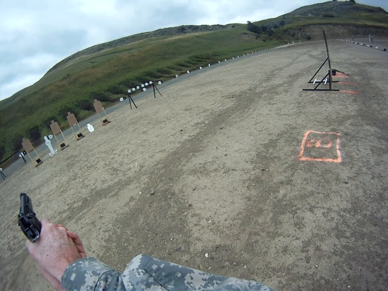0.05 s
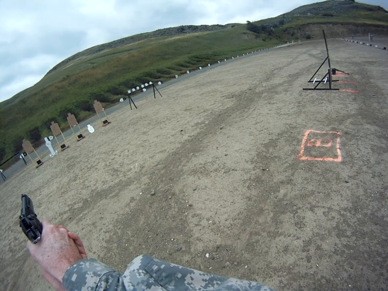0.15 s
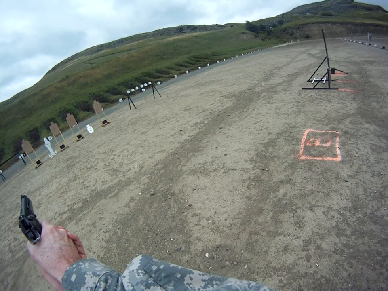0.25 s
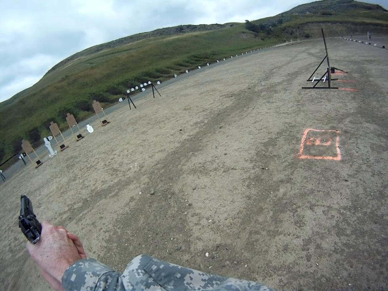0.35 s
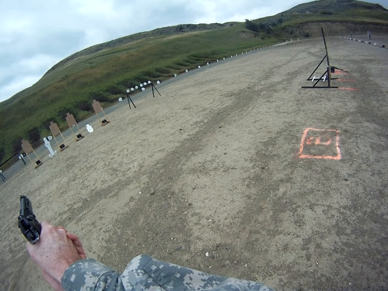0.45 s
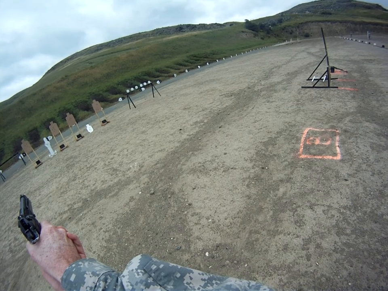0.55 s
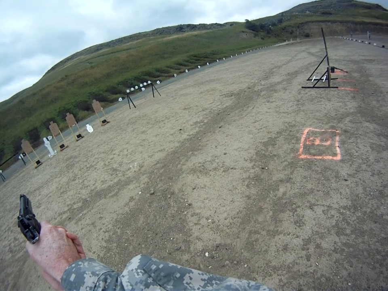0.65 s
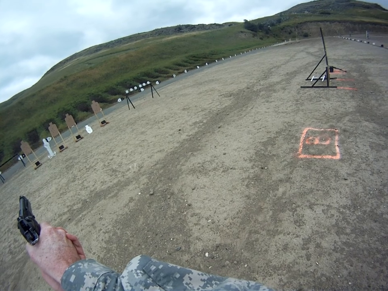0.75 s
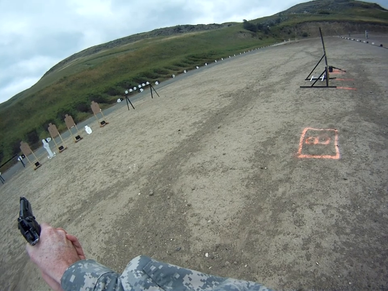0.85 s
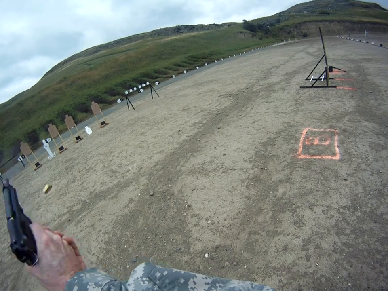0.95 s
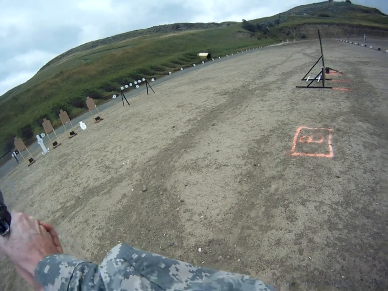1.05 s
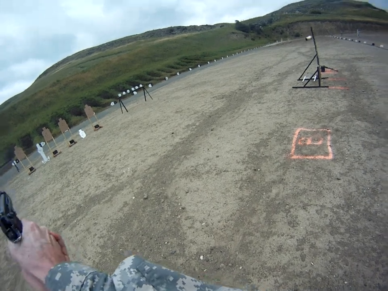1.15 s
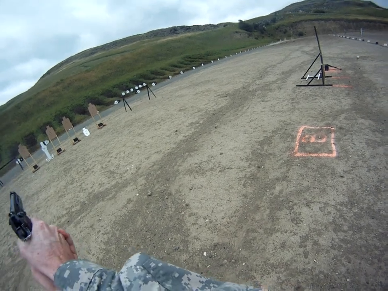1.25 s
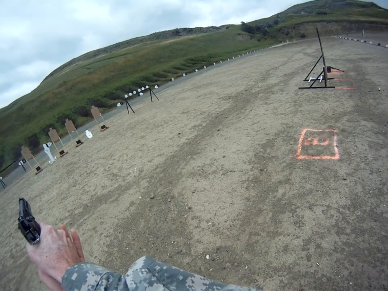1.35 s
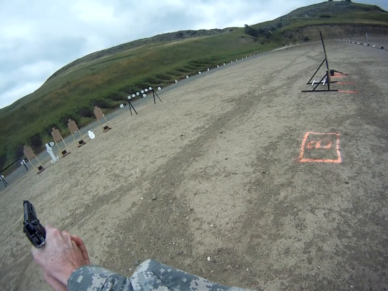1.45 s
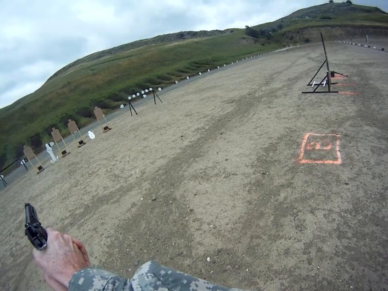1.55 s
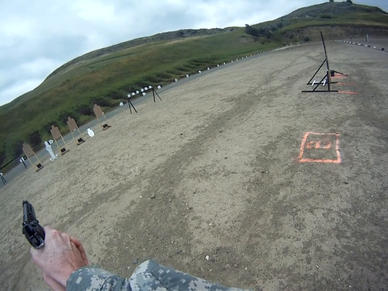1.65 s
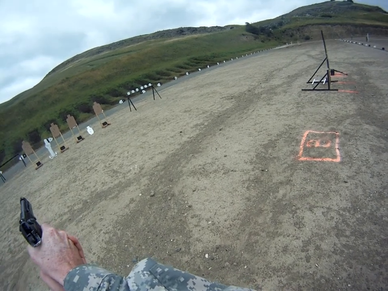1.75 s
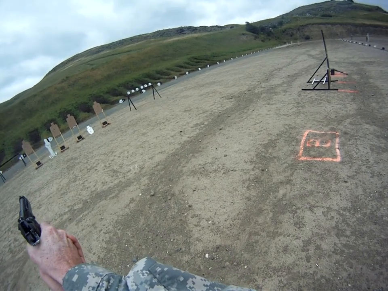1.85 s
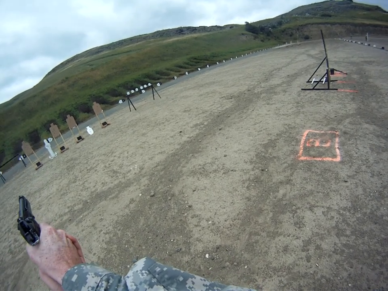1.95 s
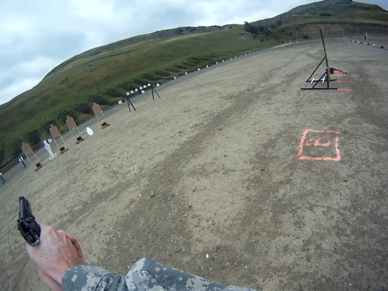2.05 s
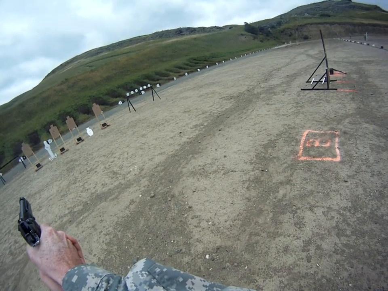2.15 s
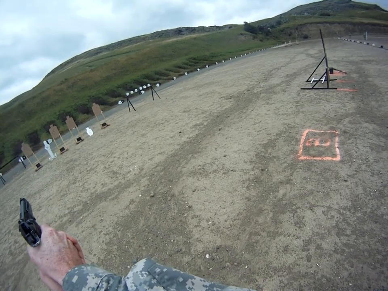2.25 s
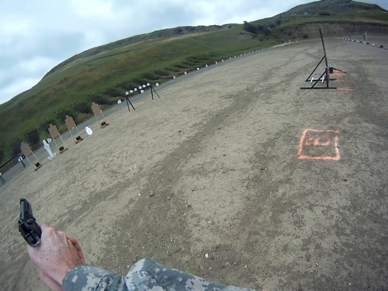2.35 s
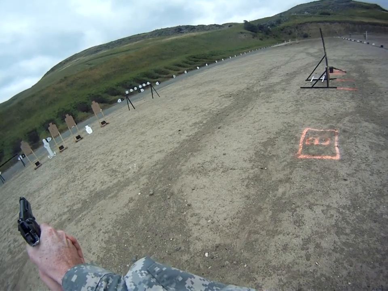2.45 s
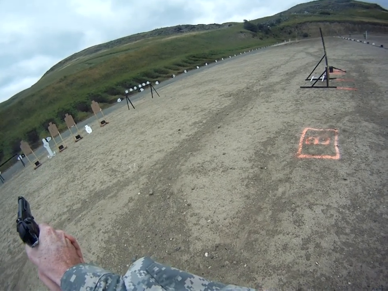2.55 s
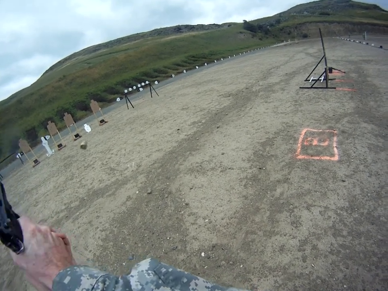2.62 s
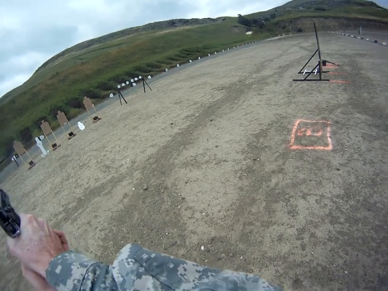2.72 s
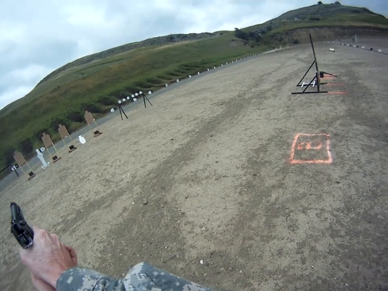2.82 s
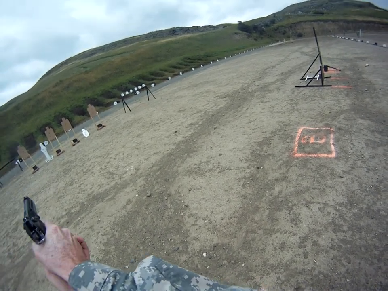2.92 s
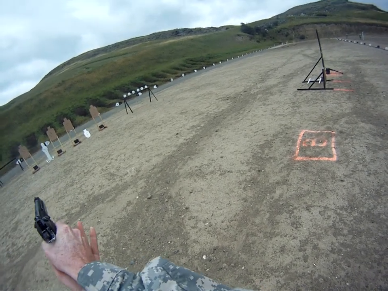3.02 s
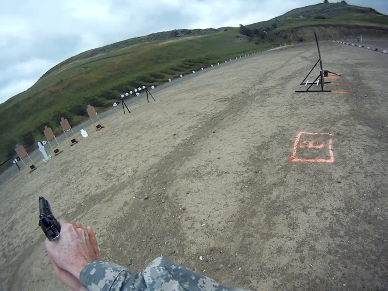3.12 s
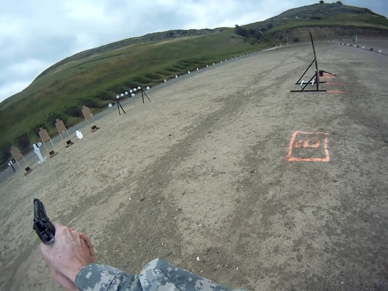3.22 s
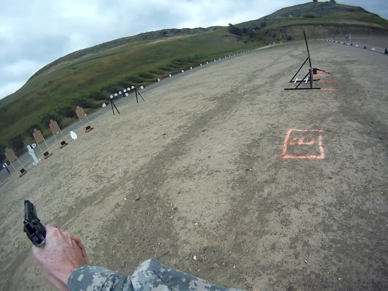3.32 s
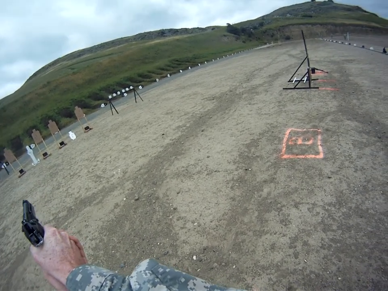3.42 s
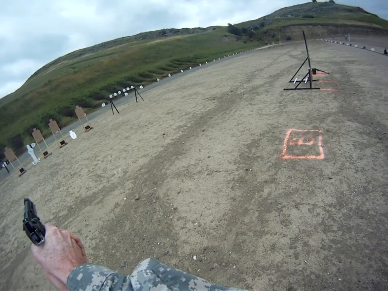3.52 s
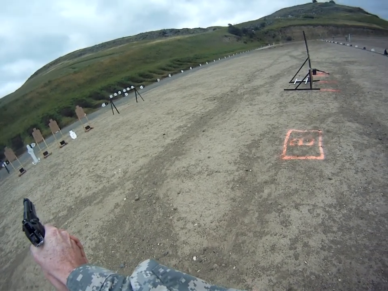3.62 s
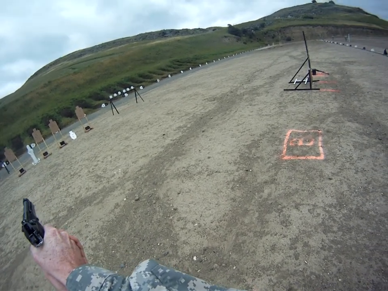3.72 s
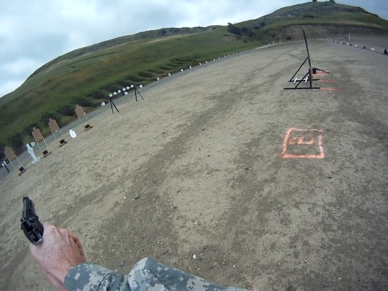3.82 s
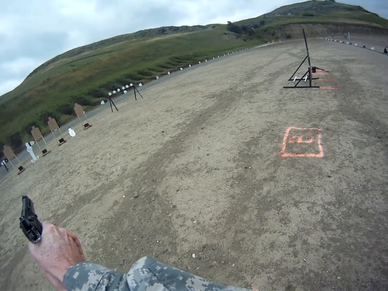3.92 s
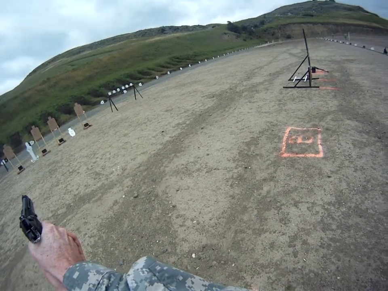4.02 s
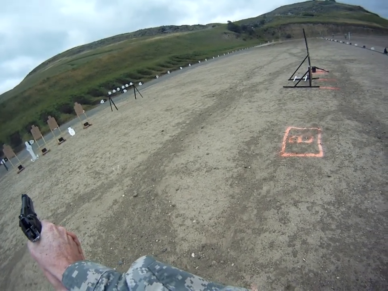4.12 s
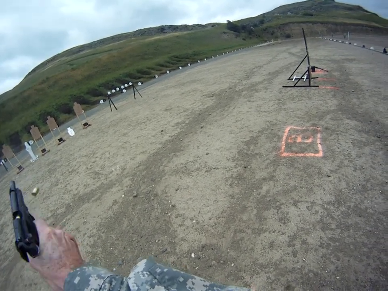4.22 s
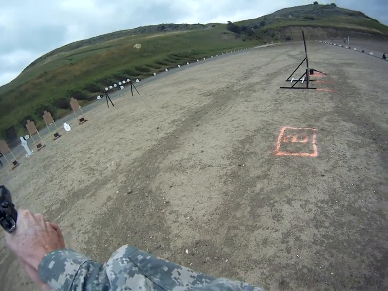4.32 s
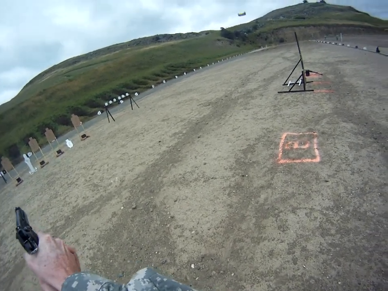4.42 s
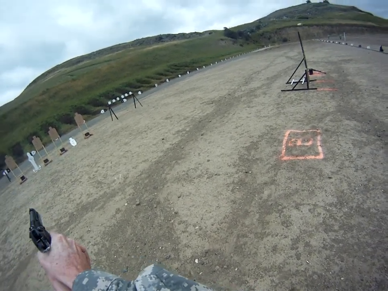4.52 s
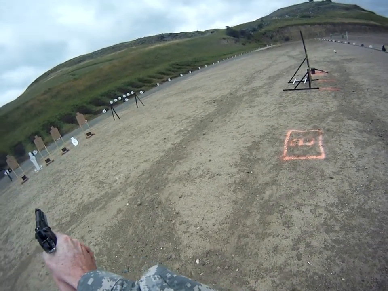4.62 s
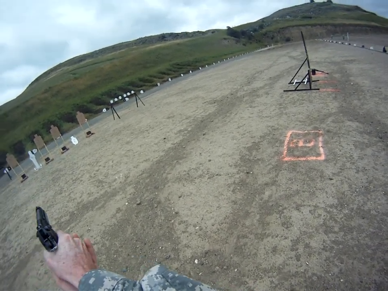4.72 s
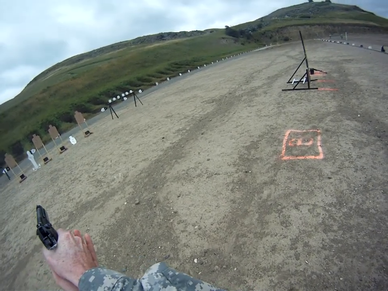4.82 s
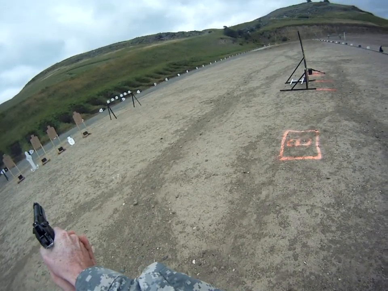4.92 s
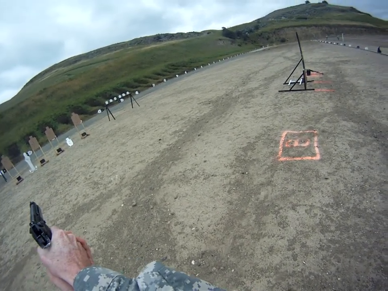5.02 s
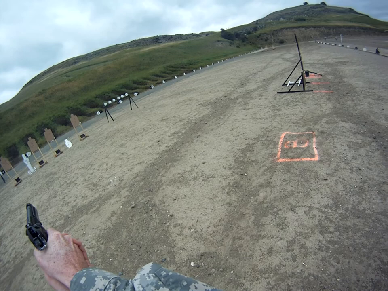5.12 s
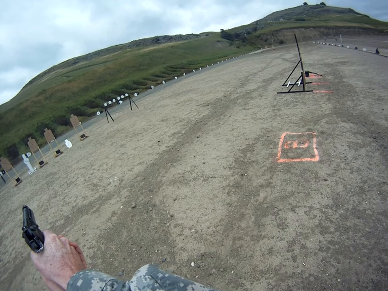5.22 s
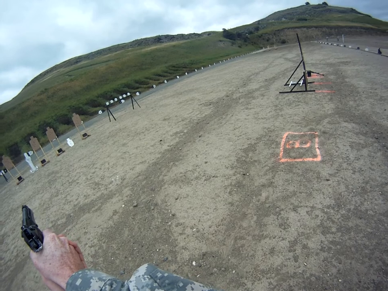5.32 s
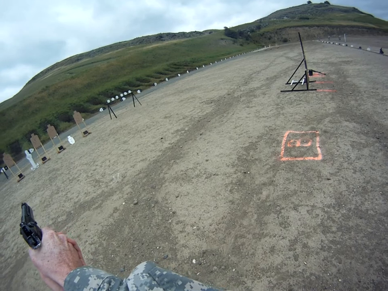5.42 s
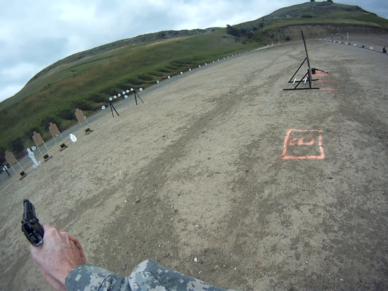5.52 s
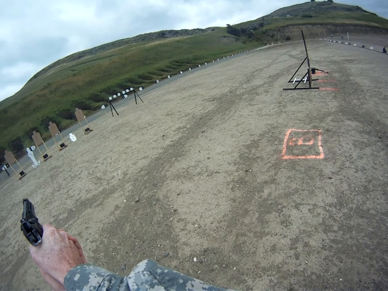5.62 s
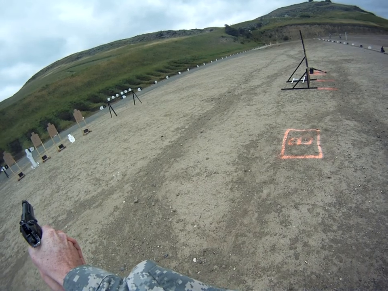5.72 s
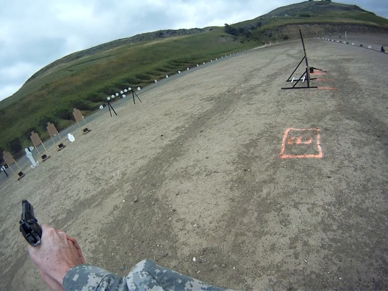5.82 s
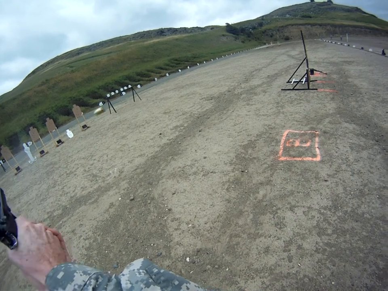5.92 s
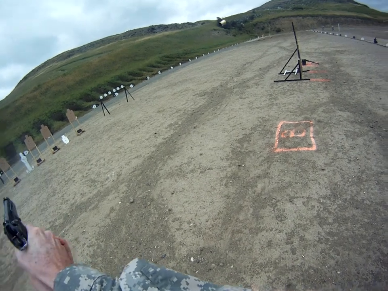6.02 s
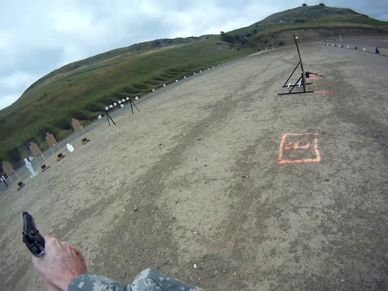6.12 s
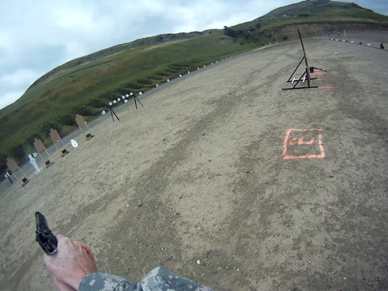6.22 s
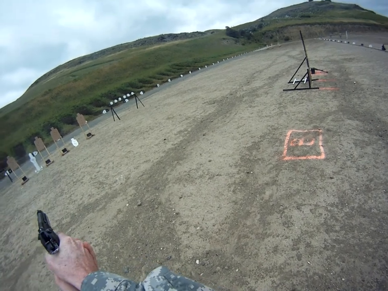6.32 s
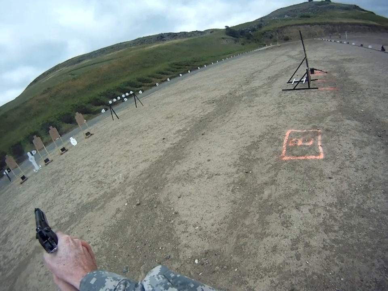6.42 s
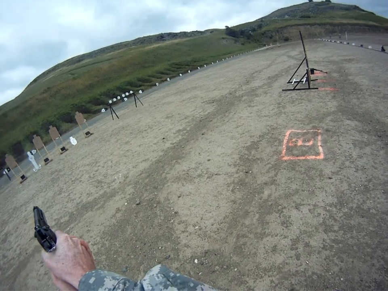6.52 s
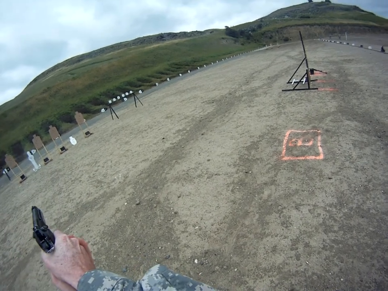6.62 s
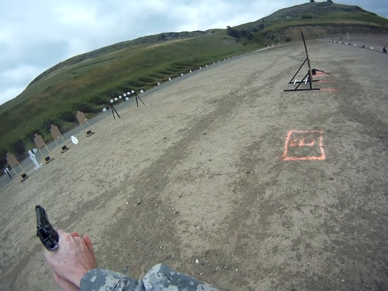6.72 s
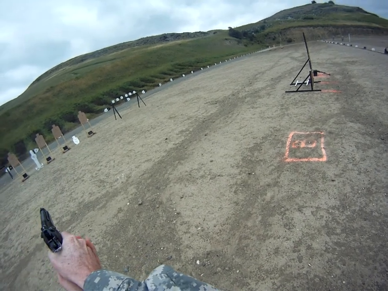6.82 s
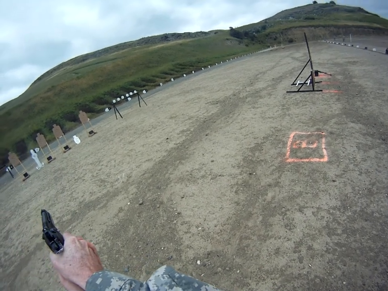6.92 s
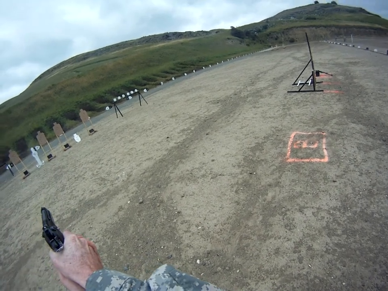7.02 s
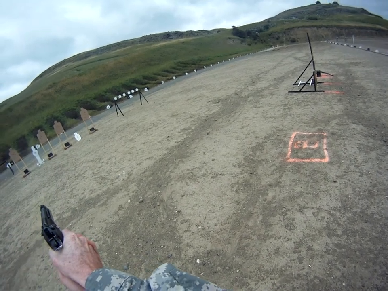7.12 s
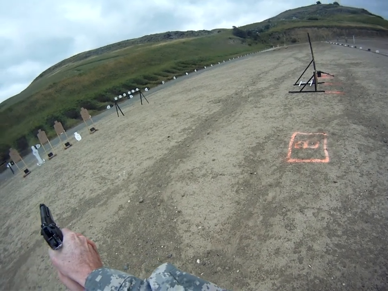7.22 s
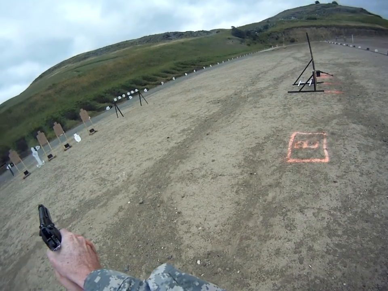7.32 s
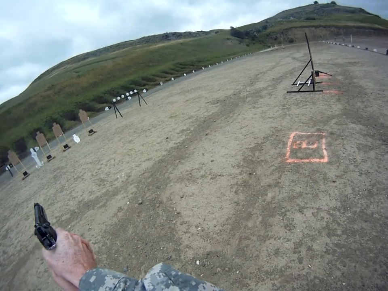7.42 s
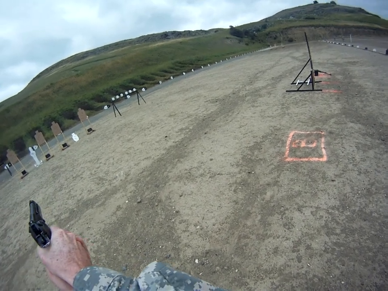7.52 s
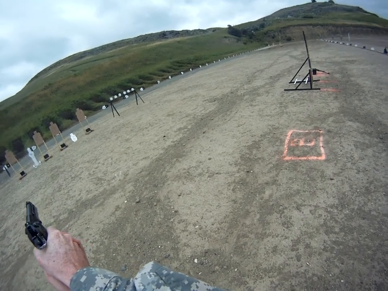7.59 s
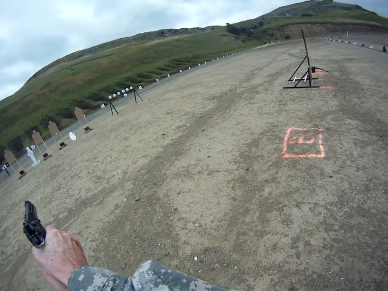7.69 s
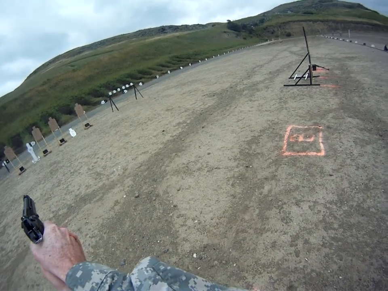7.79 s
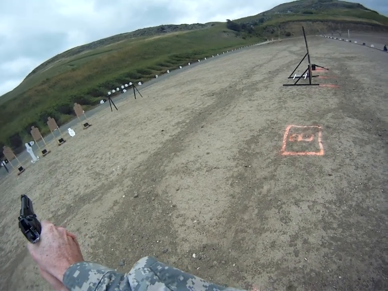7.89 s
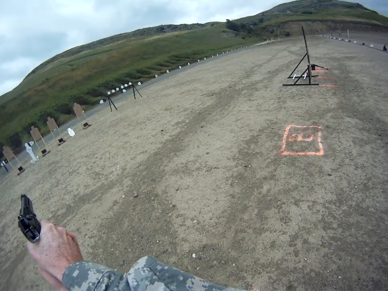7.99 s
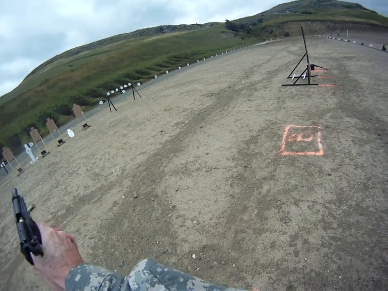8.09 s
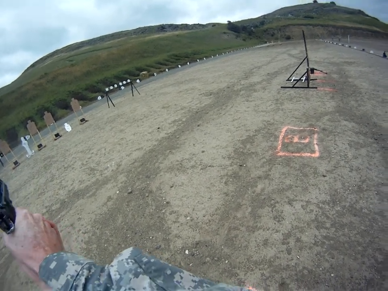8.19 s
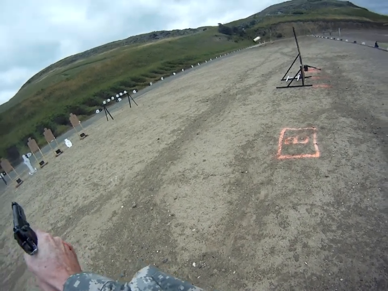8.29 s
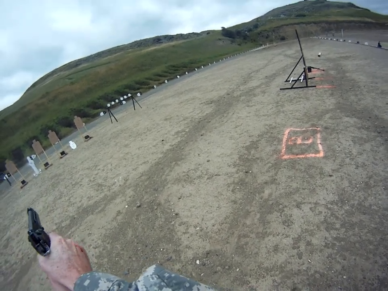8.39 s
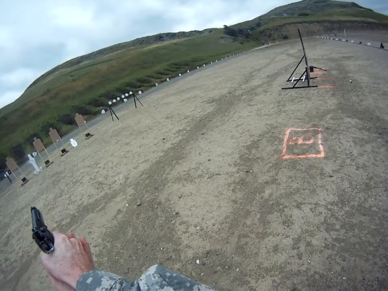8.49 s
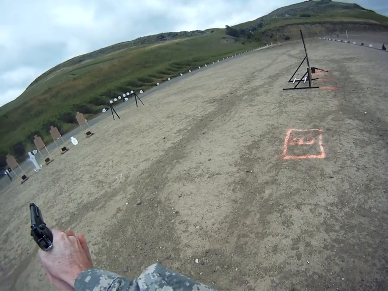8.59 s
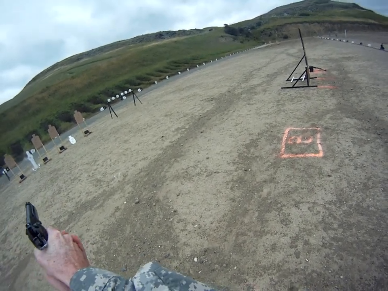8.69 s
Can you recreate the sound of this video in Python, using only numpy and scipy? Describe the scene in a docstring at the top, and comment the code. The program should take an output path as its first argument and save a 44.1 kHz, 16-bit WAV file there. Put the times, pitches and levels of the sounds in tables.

```python
"""Five pistol shots on an open range, heard by a small camera worn by the shooter, in gusty wind (coloured noise).
From 1 s on, each shot is a noise crackle and a push that overload the microphone; then the slide slams shut,
targets, berm and hillsides answer with shaped noise, and a slow low wave passes. Brass ticks on the gravel and
knocks on the housing follow the shots; steel plates ring in sine modes near 4.4 s and 6 s; the last shot is near 8.2 s.
The camera samples at a low rate and holds each sample, so mirror images of every sound fill the treble."""
import sys
import numpy as np
from scipy import signal
from scipy.fft import rfft, irfft, next_fast_len
from scipy.io import wavfile
from scipy.ndimage import uniform_filter1d

SR = 44100
rng = np.random.default_rng(int(sys.argv[2]) if len(sys.argv) > 2 else 0)


def file_out(sig):
    """Save sig as 16-bit WAV at sys.argv[1]."""
    # one column per channel
    cols = np.atleast_2d(sig).T
    # limit, then scale
    lim = np.clip(cols, -1, 1)
    pcm = np.round(lim * 32767).astype(np.int16)
    wavfile.write(sys.argv[1], SR, pcm)


N = 385875
T = np.arange(N) / SR
TARGETS_S = .1083  # echo of the targets, after the shot

# The shots; lull is relative to the blast, and the slide time counts from the shot:
# (time [s], blast [dB], crackle in the lull [dB], hillsides [dB], low wave [dB], slide shuts [s],
#  slide peak [dB], slide t60 [s], target echo peak [dB], berm face slap peak [dB])
SHOTS = [(1.0258, -3, -3, -0.5, -16, .0608, -2, .012, -24.5, -27),
         (2.6673, -2.5, -14, 0, -14, 0.061, -3.5, 0.017, -24, -22.5),
         (4.3061, -3, -13.5, -0.5, -15, 0.059, -9, 0.023, -28.5, -30),
         (5.9510, -3.5, -4, -0.5, -17.5, 0.059, -6.5, .027, -24.5, -40),
         (8.1841, -3, -5.5, -0.5, -20, 0.059, -4.5, 0.024, -18, -32)]
# Colour of the berm's return: (frequency [Hz], relative level [dB])
BERM_COLOUR = [(500, -30), (1400, -14), (1800, -18), (2050, 0), (2400, -6), (2750, -20), (3450, -16),
               (3700, -5), (3950, -18), (5200, -22), (6000, -36), (7000, -60)]
# Bright colour of a hard slap: (frequency [Hz], relative level [dB])
SLAP_COLOUR = [(500, -37), (850, -22), (1160, -5), (1350, -30.5), (1600, -11.5), (1800, -15), (1980, -2),
               (2500, -1.5), (2880, -16), (3050, -10), (3300, -24.5), (3520, -7), (3700, -17.5),
               (4650, -18), (5200, -14), (6000, -21.5), (7000, -68)]


def undb(db):
    """Amplitude factor of a level in dB."""
    return 10 ** (np.asarray(db) / 20)


def add(out, s, x):
    """Mixes x into out from time s on."""
    i = int(s * SR)
    out[i:i + len(x)] += x[:len(out) - i]


def walk(rate):
    """Random levels held 1 / rate s and slewed twice; spread near 1."""
    k = int(SR / rate)
    steps = np.repeat(rng.standard_normal(N // k + 1), k)
    return 1.3 * uniform_filter1d(uniform_filter1d(steps, k), k)[:N]


def burst(t, rise_s, t60):
    """Envelope with a quick rise and an exponential fall, peak 1."""
    e = (1 - np.exp(-t / rise_s)) ** 2 * 1000 ** (-t / t60)
    return e / e.max()


def swells(t, table):
    """Sums the powers of swells that rise to a top and fall away at steady rates in dB."""
    power = 0
    for top_s, db, rise, fall in table:
        drop_db = np.where(t < top_s, rise * (top_s - t), fall * (t - top_s))
        power = power + undb(db - drop_db) ** 2
    return np.sqrt(power)


def colour(x, spectrum):
    """Causal filter from (Hz, dB) points, so peaks ring on after a hit; white noise keeps its rms."""
    size = next_fast_len(len(x) + 2048, real=True) // 2 * 2
    hz, db = np.transpose(spectrum)
    f = np.arange(size // 2 + 1) * SR / size + 1
    gain = undb(np.interp(np.log(f), np.log(hz), db))
    # folding the cepstrum onto positive times makes the phase minimum
    cepstrum = irfft(np.log(gain), size)
    cepstrum[1:size // 2] *= 2
    cepstrum[size // 2 + 1:] = 0
    response = np.exp(rfft(cepstrum))
    return irfft(rfft(x, size) * response, size)[:len(x)] / np.sqrt(np.mean(gain ** 2))


def noise(spectrum, envelope):
    """White noise under an envelope, then coloured."""
    return colour(envelope * rng.standard_normal(len(envelope)), spectrum)


def crack(t60, dull_db, db, bright):
    """A short smeared burst, bright with a share of dull sound, scaled to its peak level."""
    # Colour of the dull share: (frequency [Hz], relative level [dB])
    dull_colour = [(150, -28), (250, -14.5), (450, -5.5), (700, -7), (1130, 1), (1500, -13), (2100, -10.5),
                   (3600, -23.5), (6000, -37)]
    e = burst(T[:4096], 0.00049, max(t60, .005))
    sound = noise(bright, e) + undb(dull_db) * noise(dull_colour, e)
    return undb(db) * sound / np.abs(sound).max()


def wind():
    """Wind at the microphone: a gusty rumble below a smooth hiss."""
    # Colour of the wind: (frequency [Hz], relative level per Hz [dB])
    wind_colour = [(8.8, -35.5), (15, -2.5), (43, -3.5), (66, -21), (91, -22.5), (261, -36), (304, -35),
                   (644, -39.5), (712, -40.5), (768, -40.5), (2970, -46), (4330, -48.5), (6000, -52.5),
                   (7800, -88.5), (13200, -120)]
    air = noise(wind_colour, np.ones(N))
    rumble = signal.sosfilt(signal.butter(2, 250, fs=SR, output="sos"), air)
    gust = undb(2.1 * walk(5))
    return undb(-45.5) * (air + (gust - 1) * rumble)


def housing_knocks():
    """Soft knocks on the camera housing, each a pair of decaying sine modes."""
    # Knocks: (time [s], level [dB])
    knocks = [(1.349, -37), (1.533, -48), (1.673, -40.5), (3.239, -47), (3.746, -52), (4.901, -41),
              (6.479, -41), (6.566, -46.5), (6.635, -47.5), (8.26, -37.5), (8.374, -38.5), (8.532, -39),
              (8.684, -43)]
    # Modes of the housing: (frequency [Hz], relative level [dB], t60 [s])
    modes = [(104.4, 1, 0.065), (232.5, -6, 0.05)]
    out, t = np.zeros(N), T[:6000]
    knock = sum(undb(g) * burst(t, 0.0041, t60) * np.sin(2 * np.pi * hz * t) for hz, g, t60 in modes)
    for at, db in knocks:
        add(out, at, undb(db) * knock)
    return out


def brass():
    """Empty cases touch the gravel, each touch a short tick of coloured noise."""
    # Touches of the cases: (time [s], peak level [dB])
    touches = [(1.3784, -32), (1.4775, -36), (1.7784, -40), (3.1194, -35), (3.4161, -41), (4.7584, -36),
               (5.1307, -41), (6.7386, -39), (8.6373, -35)]
    # Colour of the brass: (frequency [Hz], relative level [dB])
    brass_colour = [(500, -30), (1200, -14), (2200, 0), (2900, -12), (3600, -10), (4400, -14), (5100, -5),
                    (6000, -16), (7000, -40)]
    out, t = np.zeros(N), T[:6000]
    for at, db in touches:
        tick = noise(brass_colour, burst(t, .0004, .03))
        add(out, at - .001, undb(db) * tick / np.abs(tick).max())
    return out


def plates():
    """Bullets set two steel plates ringing, each a set of decaying sine modes in random phase."""
    # Strikes, one per plate: (time [s], level [dB])
    hits = [(4.385, -55), (6.02, -48)]
    # Modes, one row per plate: (frequency [Hz] of each mode)
    plate_hz = [(797, 2476, 4194, 5324, 5744), (797, 1674, 2568, 3591, 5265)]
    # Ring of those modes, one row per plate: (relative level [dB], t60 [s]) of each mode
    plate_ring = [
        [(0, 1.0), (0, .6), (1, 1.0), (1, 1.0), (-4, 1.3)],
        [(-1, .9), (-5, .8), (1, .6), (-1, 1.2), (2, .6)],
    ]
    out, t = np.zeros(N), T[:2 * SR]
    for (at, db), modes, ring in zip(hits, plate_hz, plate_ring):
        for hz, (g, t60) in zip(modes, ring):
            tone = np.sin(2 * np.pi * (hz * t + rng.random()))
            add(out, at, undb(db + g) * burst(t, .02, t60) * tone)
    return out


def echoes():
    """Targets, berm face and an earth bank slap each shot back; single flat faces crack in between."""
    # Cracks from flat faces among the slopes: (time [s], peak level [dB])
    cracks = [(2.8365, -28), (3.0515, -32.5), (4.5319, -31), (4.6007, -37), (6.2345, -32), (8.3838, -25),
              (8.41, -24)]
    face_s, bank_s = .331, .388  # after the shot
    soft_t60, face_t60, crack_t60 = 0.044, .02, 0.049  # s
    crack_dull_db = -23
    out = np.zeros(N)
    for at, *_, targets_db, face_db in SHOTS:
        # soft faces close by answer with a dull thud
        add(out, at + TARGETS_S, crack(soft_t60, 4, targets_db, SLAP_COLOUR))
        add(out, at + face_s, crack(face_t60, crack_dull_db, face_db, BERM_COLOUR))
        # the earth bank farther off answers dully
        add(out, at + bank_s, crack(soft_t60, 7, -37.5, SLAP_COLOUR))
    for at, db in cracks:
        add(out, at, crack(crack_t60, crack_dull_db, db, SLAP_COLOUR))
    return out


def scatter(size):
    """Uneven ground returns the blast in clumps; each band comes from bumps of its own size."""
    # Bands of the ground's bumps: (low edge [Hz], high edge [Hz])
    bands = [(60, 1500), (1500, 2800), (2800, 4300), (4300, 8000)]
    out, shared_db = 0, 2.5 * walk(250)[:size]
    for band in bands:
        sos = signal.butter(2, band, "band", fs=SR, output="sos")
        hiss = signal.sosfilt(sos, rng.standard_normal(size))
        out = out + undb(shared_db + 3 * walk(90)[:size]) * hiss
    return out


def far_hills(t):
    """Distant hills return fluttering swells of noise over a faint wash from the far country."""
    # Colour of the far return: (frequency [Hz], relative level [dB])
    far_colour = [(200, -16), (350, -17), (580, -12), (860, -19), (1020, -6), (1120, 0), (1250, -9),
                  (1530, -22), (2200, -14), (2720, -24), (3060, -6), (3350, -21), (3650, -15), (4200, -28),
                  (6000, -43), (7000, -70)]
    # Swells: (top after the shot [s], relative level [dB], rise [dB/s], fall [dB/s])
    hills = [(.16, -61.5, 200, 300), (.45, -60, 70, 130), (.85, -50, 350, 149), (1.05, -57.5, 60, 150),
             (1.32, -65, 200, 120.1)]
    hush = undb(-70 - 10 * t) * (t > TARGETS_S)
    return noise(far_colour, undb(2.0 * walk(100)[:len(t)]) * np.hypot(swells(t, hills), hush))


def far_boom(t):
    """Low body of a far hill's answer: one bell-shaped swell of noise."""
    # Colour of the boom: (frequency [Hz], relative level [dB])
    boom_colour = [(250, -25), (430, -8), (600, -1.5), (780, -9), (1000, -32), (3000, -56)]
    top_s, width_s = .855, 0.025
    return noise(boom_colour, undb(-56) * np.exp(-((t - top_s) / width_s) ** 2))


def berm_return(t):
    """The berm returns the blast as fluttering swells of noise."""
    # Swells: (top after the shot [s], relative level [dB], rise [dB/s], fall [dB/s])
    berm_swells = [(.07, -59, 600, 40), (.232, -46, 200, 150.2), (0.301, -38, 500, 397.6),
                   (.333, -36, 1500, 500), (.39, -46.5, 100, 160), (.5, -60.5, 100, 40.13)]
    return noise(BERM_COLOUR, undb(0.91 * walk(150)[:len(t)]) * swells(t, berm_swells))


def near_slopes(t):
    """Near slopes return the blast in clumps under a few swells."""
    # Colour of the near return: (frequency [Hz], relative level [dB])
    near_colour = [(150, -13), (400, -13), (900, -13), (1130, -5), (1330, -11), (1650, -9), (1800, -14.5),
                   (1950, -4), (2550, -3), (2720, -12), (3250, -9), (3600, -7), (3900, -14), (4800, -15.5),
                   (5250, -9.5), (6000, -27), (7000, -60)]
    # Swells: (top after the shot [s], relative level [dB], rise [dB/s], fall [dB/s])
    slopes = [(.095, -44.5, 150, 249.5), (0.179, -41.5, 501, 64), (.245, -36.5, 200, 127),
              (0.369, -47.5, 149.5, 89.5), (.55, -63, 200, 27.5), (.83, -59, 170, 102),
              (1.32, -72, 250, 97.5)]
    return colour(scatter(len(t)) * swells(t, slopes), near_colour)


def ground_wave(t, db):
    """Slow low wave over the ground: a cosine under a peaked hump."""
    top_s, wave_hz, width_s, shape = .217, 27.32, 0.023, 1.25
    u = t - top_s
    return undb(db) * np.exp(-np.abs(u / width_s) ** shape) * np.cos(2 * np.pi * wave_hz * u)


def slide():
    """The slide slams shut after each shot, a short bright crack close to the microphone."""
    out = np.zeros(N)
    for at, *_, slide_s, slide_db, slide_t60, _, _ in SHOTS:
        add(out, at + slide_s, crack(slide_t60, -30.5, slide_db, SLAP_COLOUR))
    return out


def gun_rattle(t):
    """The gun rattles as the breech unlocks and as the slide meets its stop."""
    # Colour of the gun: (frequency [Hz], relative level [dB])
    gun_colour = [(300, -20), (800, -15.5), (1120, -6.5), (1550, -22), (1800, -16), (1950, -1), (2020, -8),
                  (2110, -1), (2250, -12), (2560, -4.5), (2750, -14.5), (3700, -9.5), (4400, -20),
                  (5000, -15), (6000, -27), (7000, -50)]
    # Swells: (top after the shot [s], relative level [dB], rise [dB/s], fall [dB/s])
    rattles = [(.01, -31, 20000, 480), (.04, -33, 2999.5, 750)]
    return noise(gun_colour, swells(t, rattles))


def gas_push(t):
    """The gas cloud shoves the membrane in for one long half wave."""
    push_s = .0098
    return -undb(3.5) * np.sin(np.pi * np.minimum(t / push_s, 1))


def crackle(t, lull_db):
    """Jet, lull and second puff of gas at the muzzle, as noise under a level curve."""
    # Colour of the blast: (frequency [Hz], relative level [dB])
    blast_colour = [(150, -13), (400, -7.5), (700, -7.5), (1100, -3), (1400, -7), (2000, -3.5),
                    (2700, -2.5), (3500, 0.5), (4500, -7.5), (6000, -12.5), (7000, -41.5)]
    attack_s, jet_s, drop_s, lull_s, puff_rise_s, puff_hold_s = .0006, .0034, .001, .002, .0015, .0016
    jet_db, puff_db, puff_fall = 8, -5.5, 11000  # dB, dB, dB/s
    s = np.cumsum([0, attack_s, jet_s, drop_s, lull_s, puff_rise_s])
    db = np.interp(t, s, [-25, jet_db - 2.0, jet_db, lull_db, lull_db - 2, puff_db])
    fall_db = puff_fall * np.maximum(t - s[-1] - puff_hold_s, 0)
    return noise(blast_colour, np.ones(len(t))) * undb(db - fall_db)


def shots():
    """Each shot sums the blast at the gun, the returns of the land and the low wave."""
    out, t = np.zeros(N), T[:int(1.7 * SR)]
    for at, blast_db, lull_db, hill_db, wave_db, *_ in SHOTS:
        blast = undb(blast_db) * (crackle(t, lull_db) + gas_push(t) + gun_rattle(t))
        returns = undb(hill_db) * (near_slopes(t) + berm_return(t) + far_hills(t))
        add(out, at, blast + returns + far_boom(t) + ground_wave(t, wave_db))
    return out


def scene():
    """One microphone; the second channel is almost a copy."""
    mid = wind() + housing_knocks() + brass() + plates() + echoes() + slide() + shots()
    side = undb(-33) * mid * walk(300)
    return np.array([mid + side, mid - side])


def record(dry):
    """Coupling capacitor, guard filter, slow converter that clips and holds each sample, steep top."""
    coupling_hz, guard_hz, top_hz = 40.3, 6080, 15200
    camera_sr, hold = 12000, 4  # samples per s, repeats of each sample
    x = signal.sosfilt(signal.butter(1, coupling_hz, "high", fs=SR, output="sos"), dry)
    x = signal.sosfilt(signal.butter(4, guard_hz, fs=SR, output="sos"), x)
    slow = np.clip(signal.resample_poly(x, camera_sr, SR, axis=1), -1, 1)
    steps = np.repeat(slow, hold, axis=1)
    held = signal.resample_poly(steps, SR, camera_sr * hold, axis=1)[:, :N]
    steep = signal.ellip(6, .1, 40, top_hz, fs=SR, output="sos")
    return np.clip(signal.sosfiltfilt(steep, held), -1, 1)


dry = scene()
out = record(dry)
file_out(out)
```